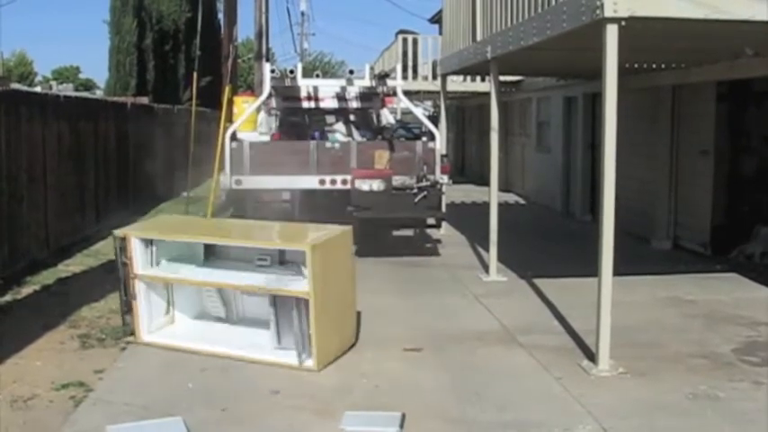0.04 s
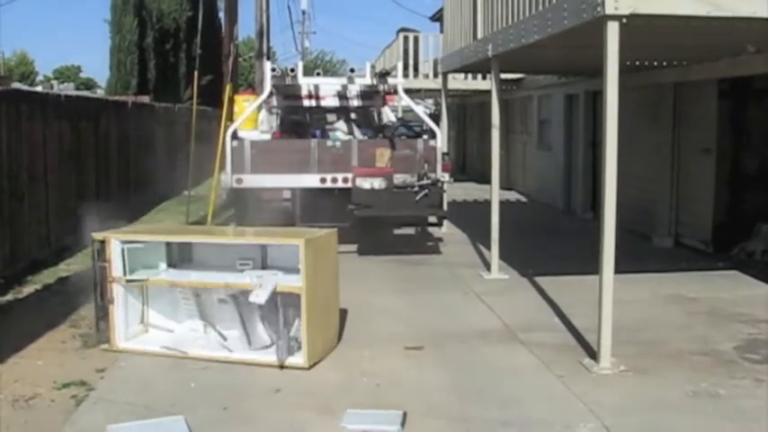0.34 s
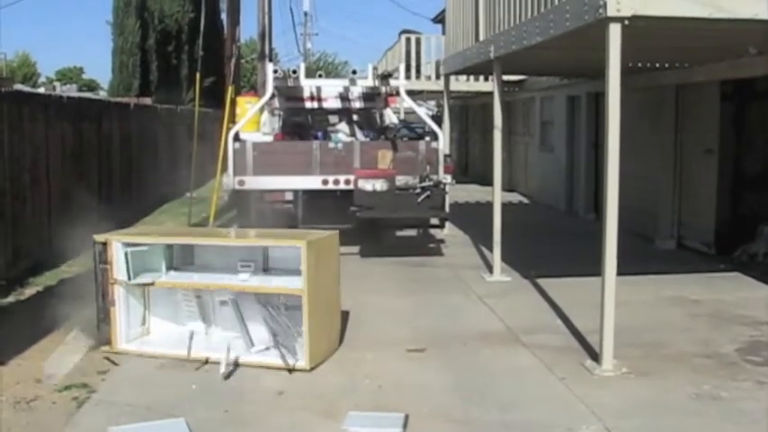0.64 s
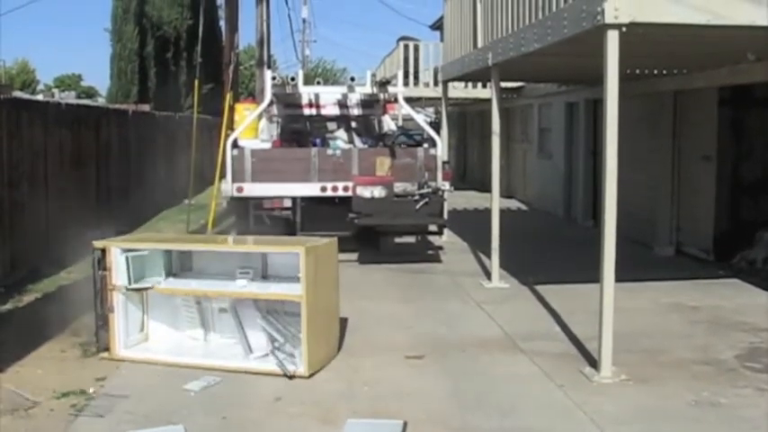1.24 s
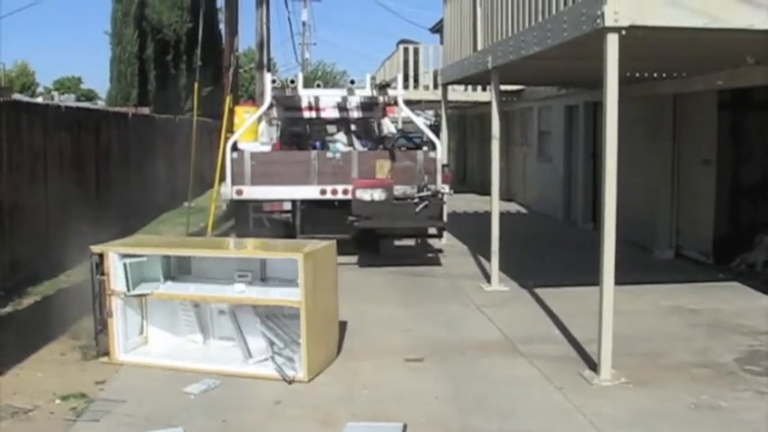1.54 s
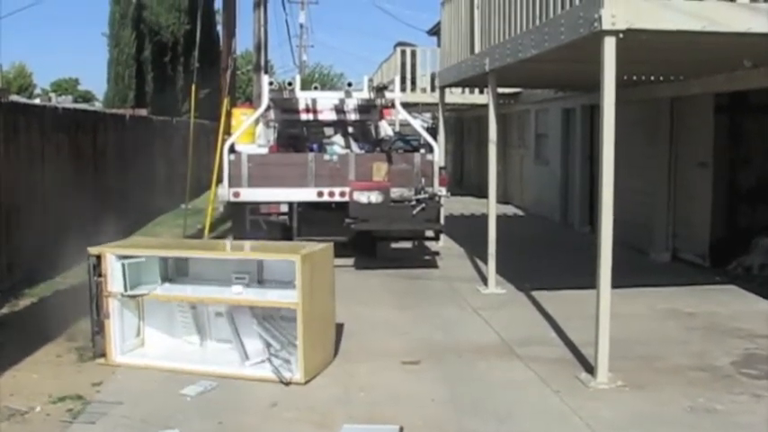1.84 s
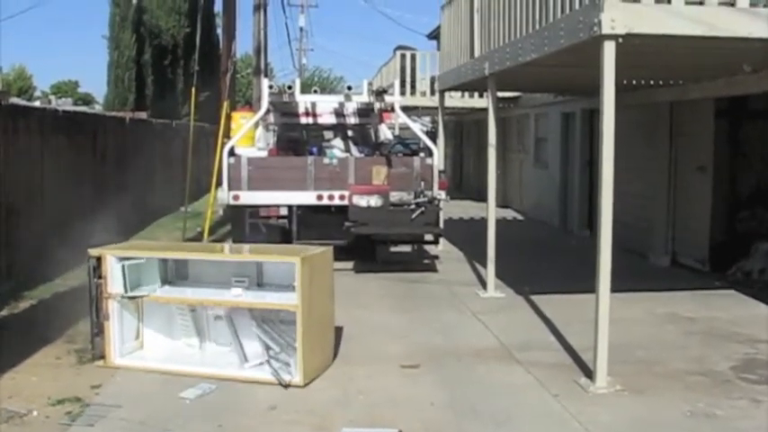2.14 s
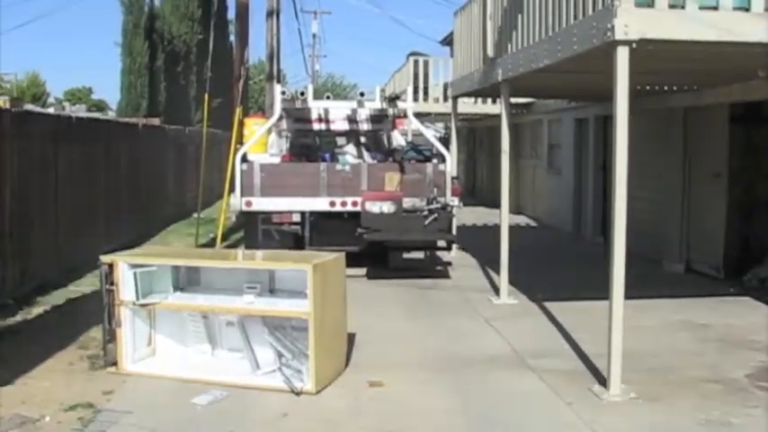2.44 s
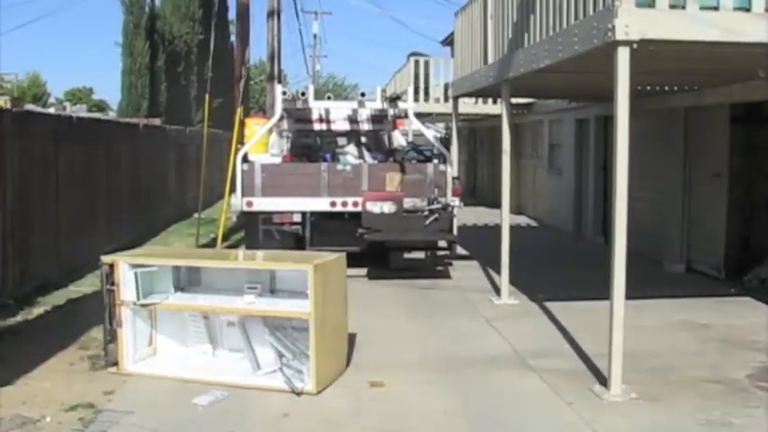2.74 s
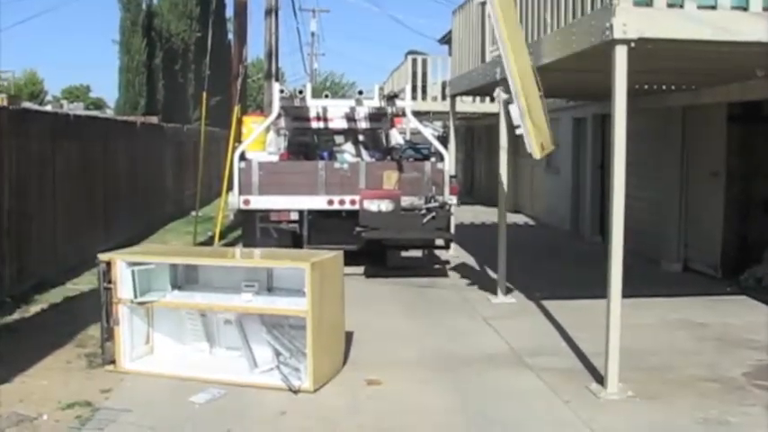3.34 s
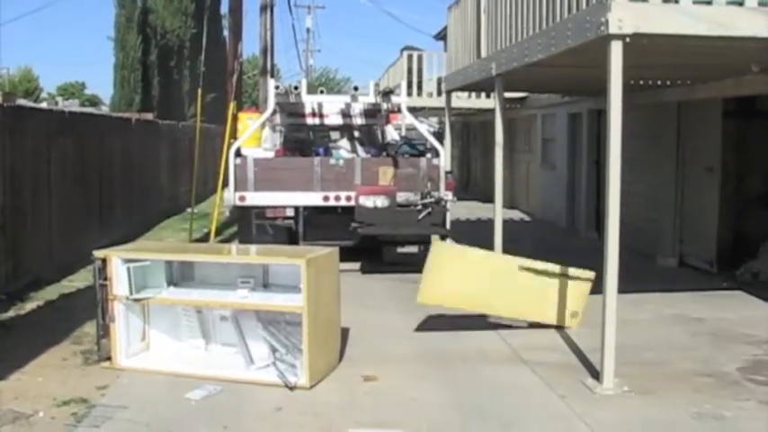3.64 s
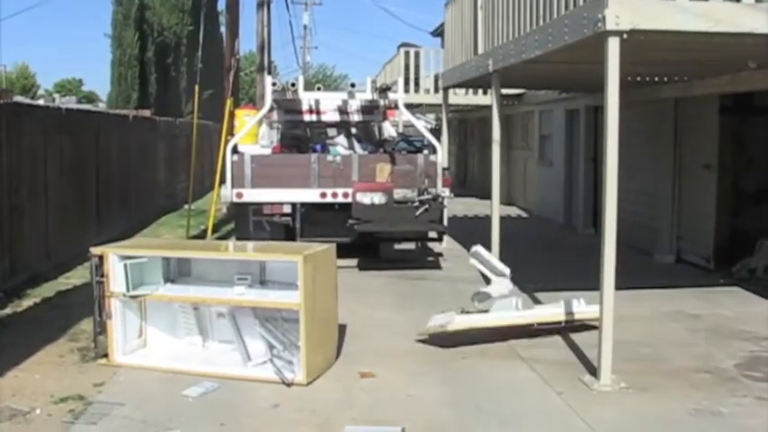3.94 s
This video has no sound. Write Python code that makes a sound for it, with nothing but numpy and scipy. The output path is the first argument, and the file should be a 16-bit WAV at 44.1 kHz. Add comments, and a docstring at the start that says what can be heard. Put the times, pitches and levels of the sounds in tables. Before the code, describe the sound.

A refrigerator hits concrete with a hollow boom and crunch, spilling bins and wire shelves that clink and skid. Over outdoor noise and a faint engine hum, a sheet-metal door scuffs an edge, then lands ahead with a loud clang.

```python
"""A refrigerator crashes onto a concrete yard: its panels boom at their resonances and its contents crunch.
Wire shelves jangle among high clinks, plastic bins clack out, and a shelf skids to rest, plucked by grit. The
background of yard noise with an engine hum rises in level, the sound drops out briefly at 2.3 s, and a distant
bird chirps twice while the sheet-metal door is bumped over a balcony edge. At 3.7 s the door slams onto the
concrete, rings in its bending modes and rebounds, loud enough to overload a limiter."""
import sys
import numpy as np
from scipy import signal
from scipy.fft import rfft, irfft, next_fast_len
from scipy.io import wavfile
from scipy.ndimage import uniform_filter1d, map_coordinates

SR = 44100
rng = np.random.default_rng(int(sys.argv[2]) if len(sys.argv) > 2 else 0)


def pcm_store(signal):
    """Save signal as 16-bit PCM."""
    levels = np.round(np.clip(np.atleast_2d(signal), -1, 1) * 32767)
    wavfile.write(sys.argv[1], SR, levels.astype(np.int16).T)


N = 176400

# Coherence of the sound field. Each row: frequency in Hz, left-right correlation.
COHERENCE = [(100, .99), (500, 0.99), (1000, 0.93), (2000, 0.62), (4000, 0.05), (10000, 0.081)]
# Level of the background. Each row: time in seconds, level in dB.
BACKGROUND_LEVEL = [(0, -24.5), (.9, -38), (1.45, -41.5), (1.75, -38), (2.0, -34), (2.3, -29.5),
                    (2.42, -20), (2.8, -17.5), (3.15, -21), (4, -19)]
# Engine hum. Each row: start and end in seconds, frequency in Hz, level in dB against the yard noise.
HUM_PARTIALS = [(.65, 2.35, 108.7, -13), (1.5, 2.35, 199, -10), (1.5, 2.35, 327, -12.5)]
# Bird calls. Each row: start in seconds, level in dB, length in seconds.
BIRD_CHIRPS = [(2.565, -40, .045), (3.395, -37.5, .052)]

# Spectra of the yard noise and of each kind of contact. Each row: frequency in Hz, relative level in dB.
YARD_NOISE_SPECTRUM = [(25, -27), (76, -2), (141, -2), (206, 0), (249, -1.5), (354, -0.5), (560, -5),
                       (936, -1.5), (1560, -3.5), (3250, -15), (5000, -27.5), (6740, -31), (8360, -28),
                       (9070, -44.5), (14000, -52.5), (16000, -69)]
SCUFF_SPECTRUM = [(200, 1), (1000, 5), (2800, 3), (5000, -4), (8300, -9.5), (10000, -18.5), (14000, -26),
                  (16000, -41)]
STEEL_SPECTRUM = [(300, -41), (1500, -11), (2400, -5), (2900, -10.5), (3400, -1), (5000, 1), (6200, -8),
                  (7000, 1.5), (8400, -6.5), (9800, -18), (13000, -19.5), (16000, -49.5)]
PLASTIC_SPECTRUM = [(100, -33), (420, -13.5), (650, -6), (1080, 0), (1400, -7.5), (2200, 3.5), (2700, -1),
                    (3400, 4), (5400, 2), (8300, -1.5), (9800, -15.5), (13000, -22), (16000, -50)]
CRUNCH_SPECTRUM = [(30, -24), (70, -12.5), (220, -3.5), (480, -4.5), (1000, -4), (1500, -4), (4800, -4.5),
                   (8200, -7), (9500, -16), (13000, -29), (16000, -43)]
DOOR_SPECTRUM = [(40, -44), (150, -3), (400, -0.5), (600, -3.5), (800, 1), (1300, -5.5), (2300, 1),
                 (4000, -5), (6000, -11), (8000, -9), (10000, -17.5), (13000, -20), (15000, -48)]
REBOUND_SPECTRUM = [(100, -18), (200, -4), (400, -2), (620, -16), (830, 9.5), (1300, -14), (5000, -50)]
# Stereo balance of the wreck. Each row: frequency in Hz, left minus right in dB.
WRECK_BALANCE = [(1300, 3), (2400, -4.5), (4400, 10), (8100, 1.5), (15000, 8)]

# Blows and rubs. Each row: start in seconds, relative level in dB, rise and T60 in seconds.
DOOR_SCUFFS = [(2.189, -33, 0.0046, 0.12), (2.234, -30, 0.0038, 0.16), (2.852, -20.5, 0.013, 0.33),
               (2.972, -16, 0.0052, 0.16), (3.602, -32.5, .001, 0.054)]
SHELF_SKIDS = [(1.147, -26.5, .005, 0.71), (1.478, -22.5, 0.01, 1), (1.62, -26.5, 0.018, 0.54)]
BIN_CLACKS = [(.618, -11, 0.0044, .2), (.695, -29.5, 0.007, 0.74), (.8545, -13.5, 0.0018, 0.26),
              (.866, -11, 0.0059, 0.15), (.97, -24.5, 0.0063, 0.55)]
CABINET_SLAMS = [(0.0, -12.5, 0.0013, 1), (.135, -22.5, 0.0079, 0.9), (.255, -22.5, 0.0048, 0.89),
                 (.39, -24.5, 0.005, 0.48)]
DOOR_SLAMS = [(3.6928, 2, 0.00042, 0.082), (3.702, 2.5, 0.021, 0.57), (3.743, 5, 0.013, 0.65),
              (3.785, -0.5, 0.011, 0.43), (3.88, -5.5, 0.013, 0.33)]
# Wire shelves striking. Each row: start in seconds, relative level in dB, rise and T60 in seconds,
# emphasised frequency in Hz, left minus right in dB.
SHELF_STRIKES = [(0.137, -19, 0.0037, 0.92, 4800, -5), (0.255, -18, 0.003, 0.31, 8300, 0),
                 (0.497, -16, 0.00042, 0.12, 5860, 1), (.531, -17, 0.0016, 0.33, 5160, 1.5),
                 (.545, -16, 0.009, 0.08, 7000, -11), (0.772, -21, 0.012, 0.25, 4900, -1),
                 (1.066, -28, 0.0024, 0.84, 8400, -2), (1.107, -22.5, 0.028, 0.23, 5700, 5),
                 (1.144, -12.5, 0.0025, 0.057, 5500, 2), (1.184, -24.5, 0.0081, 0.44, 6740, -7.5),
                 (1.303, -28.5, 0.011, 0.43, 5030, 0), (1.399, -27, 0.0028, 0.75, 6300, -3),
                 (1.475, -23.5, 0.0036, 0.7, 5300, 0.5), (1.62, -24, 0.014, .6, 5500, -4),
                 (1.67, -33, .01, 1, 6800, 2), (1.74, -32, 0.036, 0.47, 4330, 0),
                 (1.859, -28.5, 0.0027, 0.081, 3300, -1.5)]
# High clinks and the lingering ring of the wire shelf; hollow knocks of the cabinet, bin and door walls.
# Each row: start in seconds, level in dB, rise and T60 in seconds, frequency in Hz.
CLINKS_AND_SHELF_RING = [(.256, -25, .004, 0.28, 8113), (.43, -31, .012, 0.2, 8450),
                         (.55, -28.5, .005, 0.42, 4700), (1.87, -37.5, .01, 0.41, 6800)]
WALL_KNOCKS = [(.01, -12.5, 0.0047, 0.32, 240.5), (.618, -34.5, .003, 0.89, 445),
               (.865, -21.5, .003, 0.21, 1105), (2.705, -19.5, 0.0079, 0.18, 166),
               (2.809, -18, 0.01, 0.4, 207), (2.858, -10.5, 0.024, 0.056, 264),
               (3.79, -1.5, 0.0099, 0.14, 453), (3.916, -11, .008, .5, 222)]

# Modes of the sliding shelf, bin walls and door. Each row: frequency in Hz, relative level in dB.
WIRE_MODES = [(2519, -51.5), (3580, -47), (4242, -41.5), (4662, -41.5), (5265, -43), (5685, -44.5),
              (5790, -43), (6062, -47), (6438, -51), (6896, -49), (8010, -45.5)]
BIN_WALL_MODES = [(1940, -4), (2229, -3.5), (2480, -0.5), (3435, -3.5), (4953, 7)]
DOOR_UPPER_MODES = [(1825, -8), (2256, 3), (2363, -6), (2487, -4), (2622, -2), (3176, 1), (4640, -4)]
# Lower modes of the door. Each row: frequency in Hz, relative level in dB, T60 in seconds.
DOOR_LOWER_MODES = [(766, -11.5, 0.55), (861, -5, 0.36), (945, -1, 0.13), (1078, -13, 0.4)]
# Resonances of the cabinet. Each row: frequency and bandwidth in Hz, relative level in dB.
PANEL_RESONANCES = [(75, 6.9, -6.5), (151, 12, -2.5), (198.4, 13, 0), (262.6, 9.2, 3.5), (320.6, 24, -2),
                    (453, 16, -6.5)]


def amp(db):
    """Decibels to amplitude ratio."""
    return 10 ** (np.asarray(db) / 20)


def unit(x):
    """Normalisation to rms 1."""
    return x / np.sqrt(np.mean(x ** 2) + 1e-20)


def clock():
    """Time of each sample in seconds."""
    return np.arange(N) / SR


def along(points, hz):
    """Interpolation of (Hz, value) points on a logarithmic frequency axis."""
    f, v = np.transpose(points)
    return np.interp(np.log(hz + 1), np.log(f + 1), v)


def colour(points):
    """Magnitude response through (Hz, dB) points."""
    return lambda hz: amp(along(points, hz))


def wobble(rate):
    """Smooth random modulation with rate knots a second."""
    coarse = clock()[::64]
    curve = map_coordinates(rng.standard_normal(400), [coarse * rate], mode="mirror")
    return np.interp(clock(), coarse, curve)


def filtered(x, response):
    """Linear filtering: the spectrum is multiplied by a frequency response."""
    size = x.shape[-1]
    padded = next_fast_len(size + 4096, True)
    return irfft(rfft(x, padded) * response(np.fft.rfftfreq(padded, 1 / SR)), padded)[..., :size]


def noise(gain, grain_db=0, size=N):
    """Partly coherent stereo noise of rms 1; modulation by grain_db breaks it into tiny contacts."""
    def mid_and_side(hz):
        angle = np.arccos(np.clip(along(COHERENCE, hz), -1, 1)) / 2
        return gain(hz) * [np.cos(angle), np.sin(angle)]
    grains = amp(grain_db * unit(uniform_filter1d(rng.standard_normal(size), size=40)))
    mid, side = filtered(grains * rng.standard_normal((2, size)), mid_and_side)
    return unit(np.array([mid + side, mid - side]))


def envelope(blows, size=N):
    """Incoherent addition: blows rise linearly, fall 60 dB in T60, and sum in power."""
    t = np.arange(size) / SR
    power = 0
    for start, db, rise, t60 in blows:
        attack = np.clip((t - start) / rise, 0, 1)
        decay_db = 60 * np.clip((t - start - rise) / t60, 0, 2)
        power += (attack * amp(db - decay_db)) ** 2
    return np.sqrt(power)


def scattered(low_hz, high_hz, count):
    """Equally strong modes at uniformly random frequencies."""
    return [(hz, 0) for hz in rng.uniform(low_hz, high_hz, count)]


def ring(x, modes, t60):
    """Modal superposition: x drives damped modes, phased at random per channel; its power is kept."""
    t = np.arange(int(min(t60, 1) * SR)) / SR
    hz, db = np.transpose(modes)
    weights = amp(db) * np.exp(2j * np.pi * rng.random((2, len(hz))))
    impulse_response = (weights @ np.exp(2j * np.pi * np.outer(hz, t))).real * amp(-60 * t / t60)
    return unit(signal.oaconvolve(x, impulse_response, axes=1)[:, :x.shape[1]]) * x.std()


def yard(whine_hz=8295):
    """Amplitude modulation: steady yard noise, an engine hum and a thin whine follow one level curve."""
    t = clock()
    yard_noise = noise(colour(YARD_NOISE_SPECTRUM)) * amp(0.28 * wobble(17))
    hum = np.zeros(N)
    for start, end, hz, db in HUM_PARTIALS:
        gain = np.clip((t - start) / 0.2, 0, 1) * (t < end) * amp(db + 2.8 * wobble(5.3))
        hum += gain * np.sin(2 * np.pi * hz * t + .5 * wobble(3.0))
    whine = amp(-27) * np.sin(2 * np.pi * whine_hz * t + wobble(45))
    return amp(np.interp(t, *np.transpose(BACKGROUND_LEVEL))) * (yard_noise + hum + whine)


def bird(from_hz=3050, to_hz=4500):
    """Frequency modulation: each whistle is a pure tone gliding exponentially upward."""
    out = np.zeros(N)
    for start, db, length in BIRD_CHIRPS:
        progress = np.clip((clock() - start) / length, 0, 1)
        hz = from_hz * (to_hz / from_hz) ** progress
        arch = np.sqrt(np.abs(np.sin(np.pi * progress)))
        out += amp(db) * arch * np.sin(2 * np.pi * np.cumsum(hz) / SR)
    return out


def reflections(x, t60=0.39, bass_cut_hz=700):
    """Diffuse reverberation: fence and house return a short tail, weak in the bass."""
    t = np.arange(SR) / SR
    tail = rng.standard_normal((2, SR)) * amp(-60 * t / t60) * np.clip(t / 0.056, 0, 1)
    echo = signal.fftconvolve(x, tail / np.linalg.norm(tail[0]), axes=1)[:, :N]
    return filtered(echo, lambda hz: hz / (hz + bass_cut_hz))


def scuffs():
    """Friction: the door rubs on the balcony in short bursts of noise."""
    return envelope(DOOR_SCUFFS) * noise(colour(SCUFF_SPECTRUM))


def struck(blows, waver_rad):
    """Free vibration: each blow leaves one damped mode of slightly unsteady phase."""
    out = np.zeros(N)
    for start, db, rise, t60, hz in blows:
        phase = 2 * np.pi * hz * (clock() - start) + waver_rad * wobble(60)
        out += envelope([(start, db, rise, t60)]) * np.sin(phase)
    return out


def skid():
    """Forced vibration: the grit of the concrete keeps plucking the wires of a sliding shelf."""
    grit = envelope(SHELF_SKIDS) * noise(np.ones_like, grain_db=7)
    return amp(-2) * ring(grit, WIRE_MODES, t60=0.48)


def shelves(peak_db=7, peak_octaves=0.23, click_t60=0.025):
    """Impact excitation: each contact clicks, scrapes and sets its own wires tinkling."""
    out = np.zeros((2, N))
    size = SR // 2
    for start, db, rise, t60, peak_hz, pan_db in SHELF_STRIKES:
        def spectrum(hz):
            octaves = np.log2((hz + 1) / peak_hz)
            return amp(along(STEEL_SPECTRUM, hz) + peak_db * np.exp(-(octaves / peak_octaves) ** 2))
        scrape, click = (0, db - 2, rise, t60), (0, db, rise, click_t60)
        contact = envelope([scrape, click], size) * noise(spectrum, grain_db=2, size=size)
        tinkle = ring(contact, scattered(2200, 14000, count=54), t60=0.22)
        balance = amp([[pan_db / 2], [-pan_db / 2]])
        out[:, round(start * SR):][:, :size] += (amp(-2) * contact + amp(2) * tinkle) * balance
    return out


def bins():
    """Heavy damping: plastic bins land in bursts of contacts, and their walls ring only briefly."""
    contacts = envelope(BIN_CLACKS) * noise(colour(PLASTIC_SPECTRUM), grain_db=1)
    return contacts + amp(-11.5) * ring(contacts, BIN_WALL_MODES, t60=0.087)


def cabinet():
    """Resonance: the panels boom as second-order resonators while the contents crunch and ring."""
    def panels(hz):
        return sum((-1) ** k * amp(db) * 1j * hz * width / (centre ** 2 - hz ** 2 + 1j * hz * width)
                   for k, (centre, width, db) in enumerate(PANEL_RESONANCES))
    slams = envelope(CABINET_SLAMS)
    crunch = slams * amp(1.65) * noise(colour(CRUNCH_SPECTRUM), grain_db=1)
    boom = slams * amp(-3.5) * noise(panels)
    return boom + crunch + amp(-8) * ring(crunch, scattered(701, 6000, count=60), t60=0.24)


def door(rebound_s=3.782, dull_from_s=3.795, dull_above_hz=4700, dull_db=16):
    """Plate vibration: a corner cracks down and rings the sheet; the rest slaps, rebounds and dulls."""
    t, touch_s = clock(), DOOR_SLAMS[0][0]
    sheet = np.zeros(N)
    for hz, db, t60 in DOOR_LOWER_MODES:
        phase = 2 * np.pi * hz * (t - touch_s) + .5 * wobble(70)
        sheet += envelope([(touch_s, db, .002, t60)]) * np.sin(phase)
    rattle = envelope(DOOR_SLAMS) * noise(colour(DOOR_SPECTRUM), grain_db=1)
    treble = filtered(rattle, lambda hz: hz ** 4 / (hz ** 4 + dull_above_hz ** 4))
    treble_loss = 1 - amp(-dull_db * np.clip((t - dull_from_s) / 0.14, 0, 1))
    crack = envelope([(touch_s, 0, .0005, .025)]) * noise(colour(STEEL_SPECTRUM))
    clang = amp(-11) * ring(rattle, DOOR_UPPER_MODES, t60=0.22)
    rebound = envelope([(rebound_s, -2, .012, 0.18)]) * noise(colour(REBOUND_SPECTRUM))
    return amp(5) * sheet + rattle - treble_loss * treble + crack + clang + rebound


def scene():
    """Superposition: the wreck to the left and the door ahead add to their echoes and the background."""
    wreck = cabinet() + bins() + shelves() + skid()
    wreck = filtered(wreck, lambda hz: amp(along(WRECK_BALANCE, hz) * np.array([[.5], [-.5]])))
    knocks = struck(WALL_KNOCKS, waver_rad=0.98)
    high_rings = struck(CLINKS_AND_SHELF_RING, waver_rad=0.57)
    direct = wreck + knocks + high_rings + scuffs() + bird() + door()
    return direct + amp(-12) * reflections(direct) + yard()


def record(dry):
    """Dynamic compression: a fast limiter, then soft clipping, a brief dropout and a band limit."""
    limit_db, attack_s, release_db_per_s = -6, 0.0029, 11
    gap_start_s, gap_end_s, top_hz = 2.3, 2.4036, 15800
    t = clock()
    window = np.hanning(200)
    power = np.abs(signal.lfilter(window / window.sum(), 1, np.mean(dry ** 2, axis=0)))
    over_db = np.maximum(10 * np.log10(power + 1e-12) - limit_db, 0)
    held_db = np.maximum.accumulate(over_db + release_db_per_s * t) - release_db_per_s * t
    pole = np.exp(-1 / (attack_s * SR))
    limited = dry * amp(-signal.lfilter([1 - pole], [1, -pole], held_db))
    clipped = limited / (1 + (limited / .9) ** 6) ** (1 / 6)
    fade_out = np.clip((gap_start_s - t) / 0.0074, 0, 1)
    fade_in = np.clip((t - gap_end_s) / 0.079, 0, 1) ** 1.13
    return filtered(clipped * (fade_out + fade_in), lambda hz: np.clip((top_hz - hz) / 300, 0, 1))


dry = scene()
out = record(dry)
pcm_store(out)
```